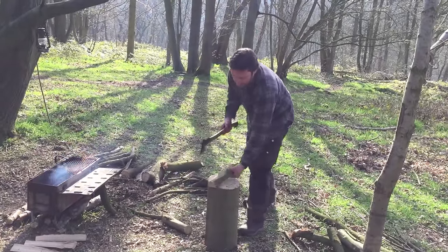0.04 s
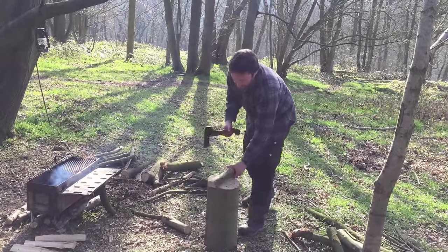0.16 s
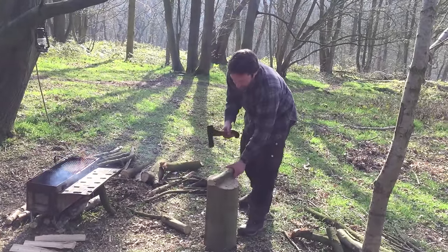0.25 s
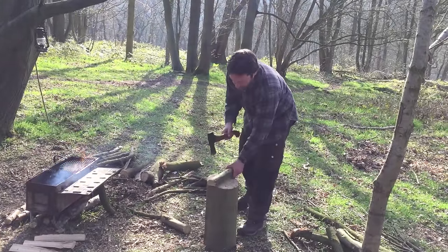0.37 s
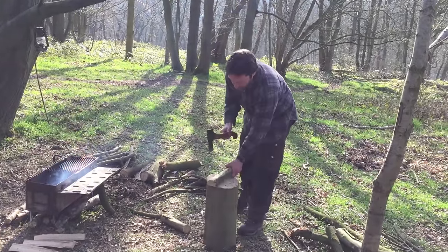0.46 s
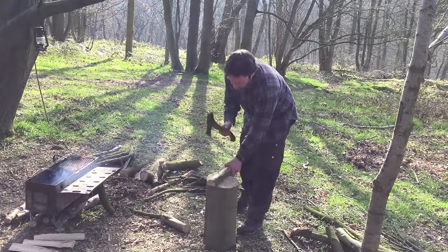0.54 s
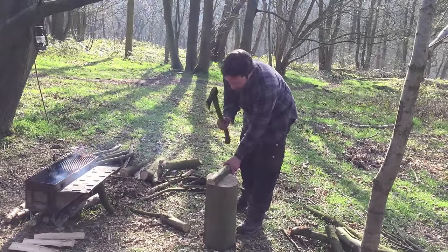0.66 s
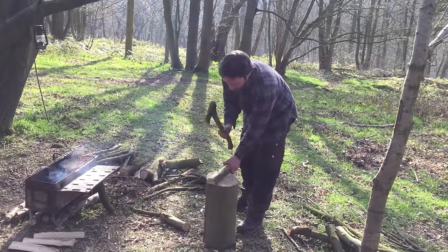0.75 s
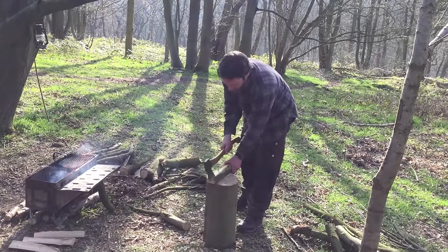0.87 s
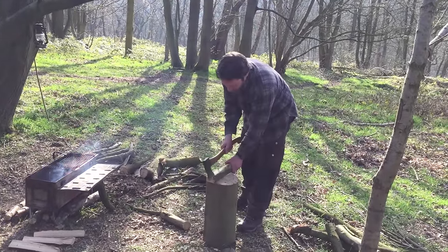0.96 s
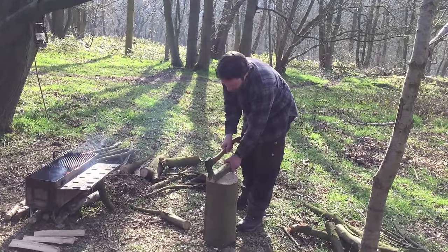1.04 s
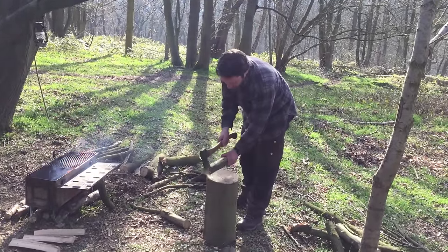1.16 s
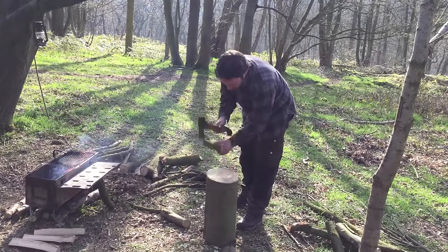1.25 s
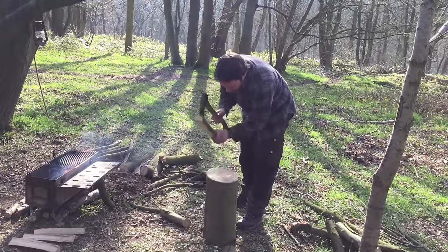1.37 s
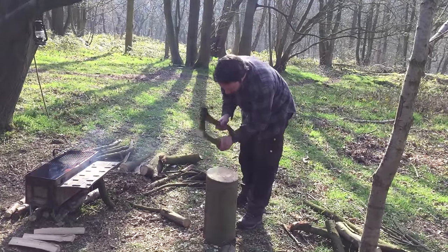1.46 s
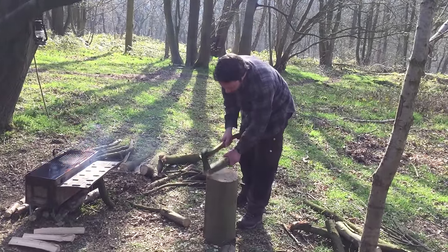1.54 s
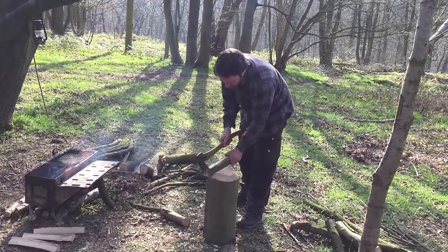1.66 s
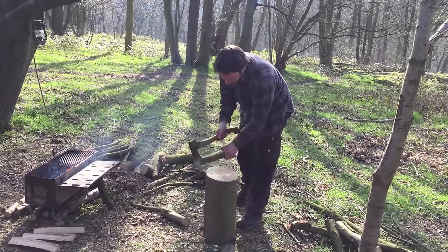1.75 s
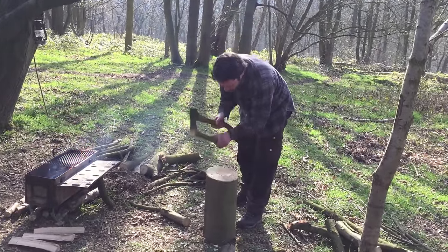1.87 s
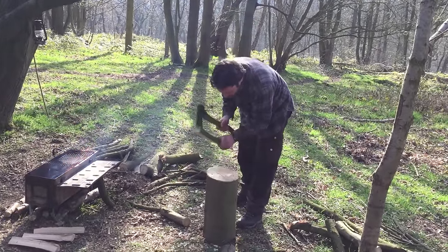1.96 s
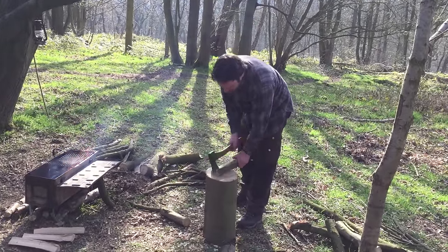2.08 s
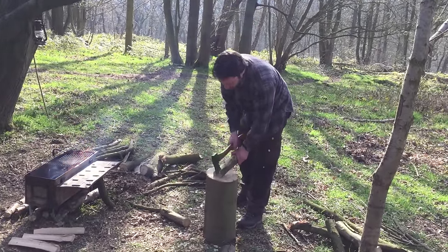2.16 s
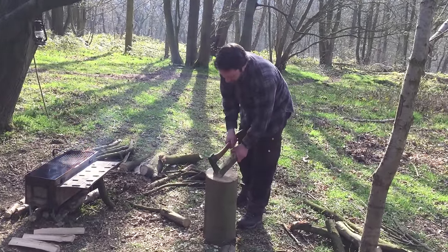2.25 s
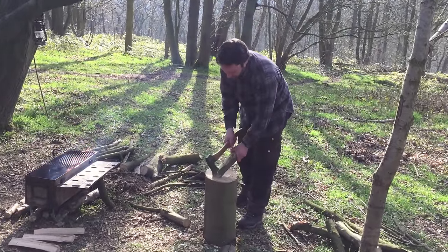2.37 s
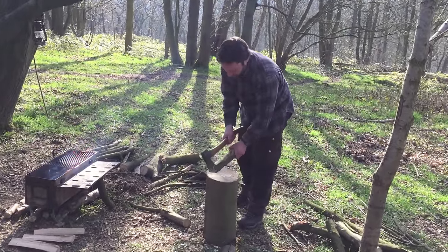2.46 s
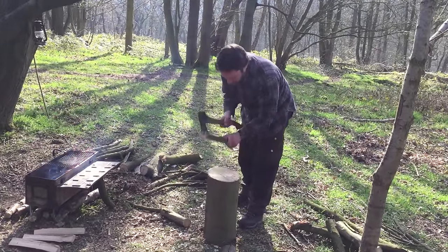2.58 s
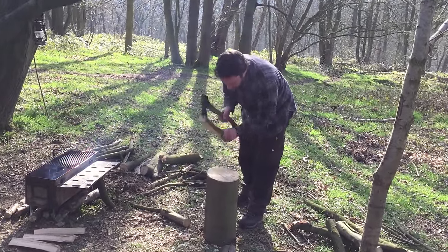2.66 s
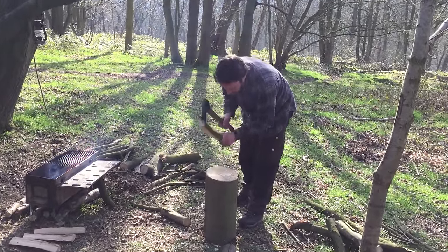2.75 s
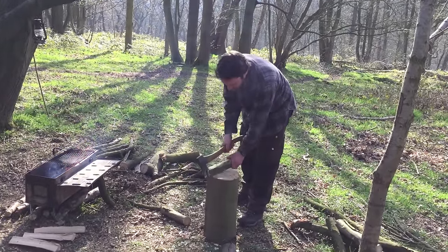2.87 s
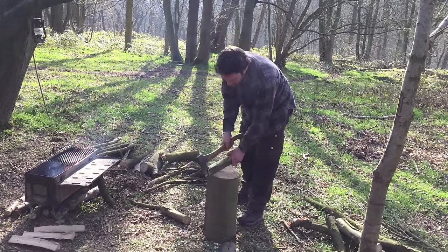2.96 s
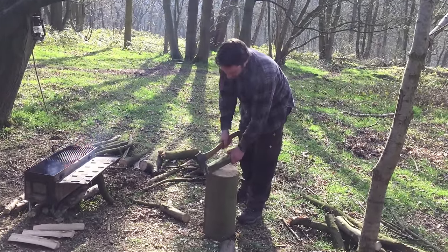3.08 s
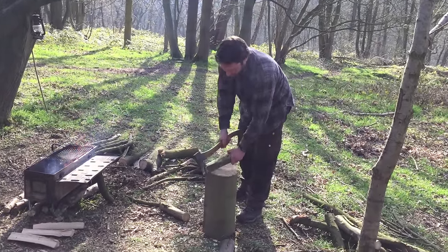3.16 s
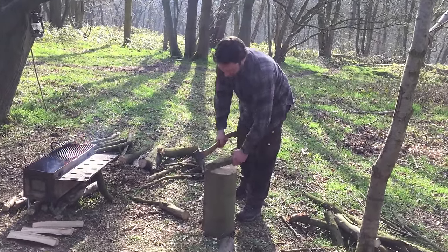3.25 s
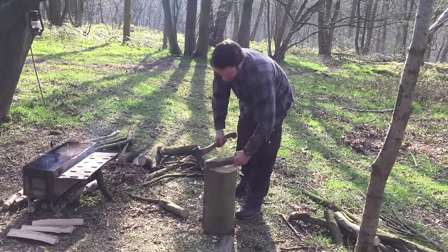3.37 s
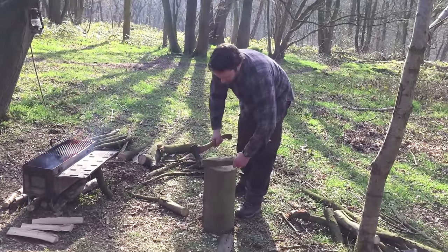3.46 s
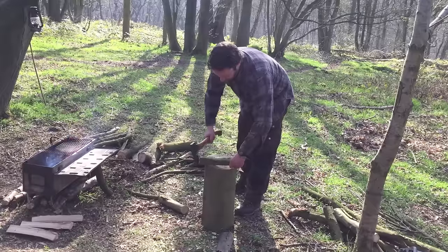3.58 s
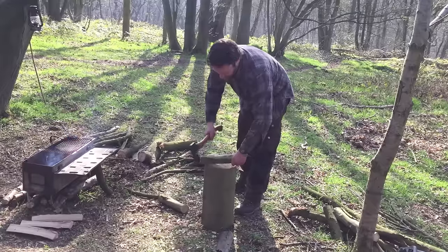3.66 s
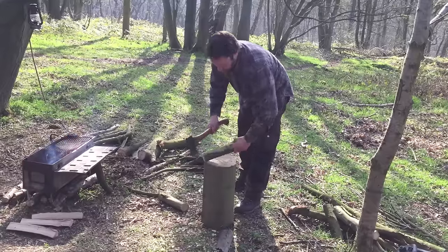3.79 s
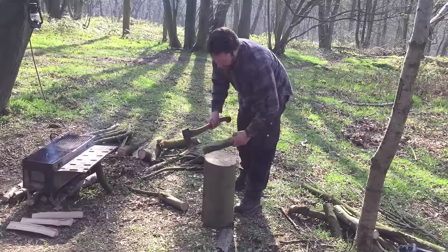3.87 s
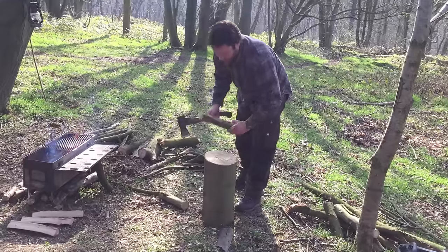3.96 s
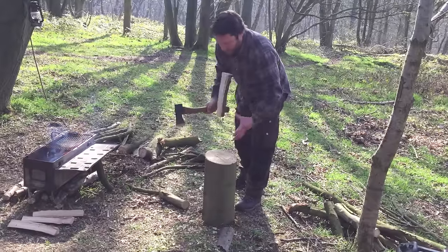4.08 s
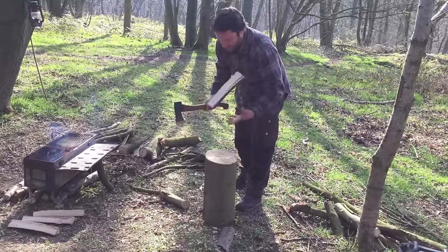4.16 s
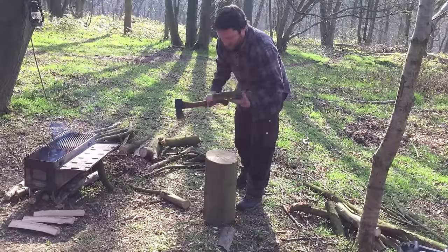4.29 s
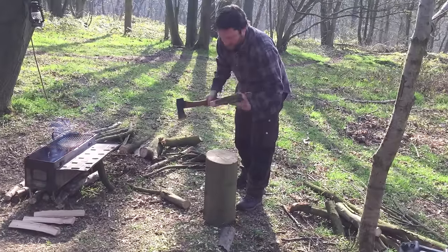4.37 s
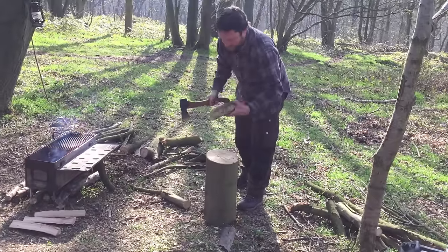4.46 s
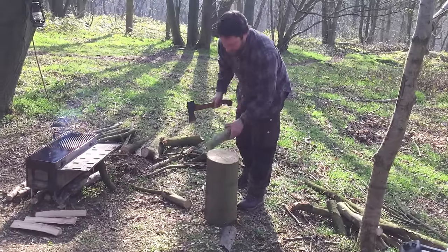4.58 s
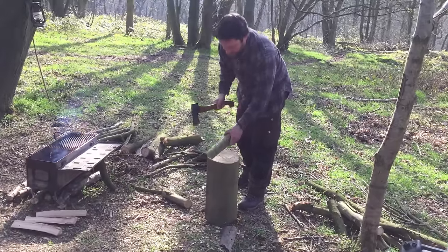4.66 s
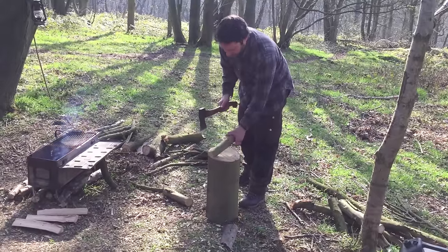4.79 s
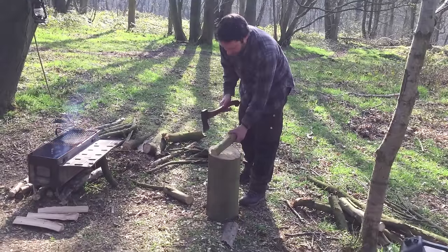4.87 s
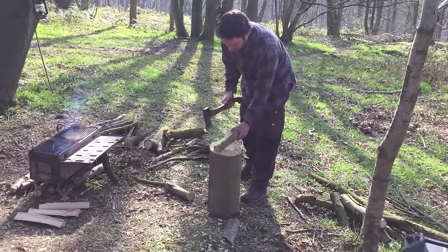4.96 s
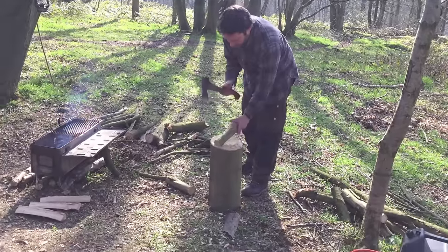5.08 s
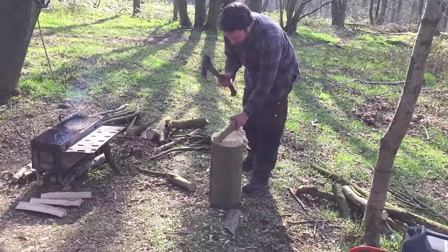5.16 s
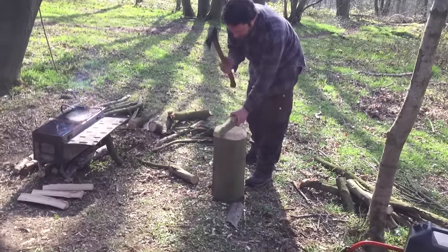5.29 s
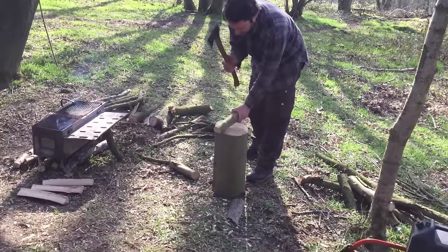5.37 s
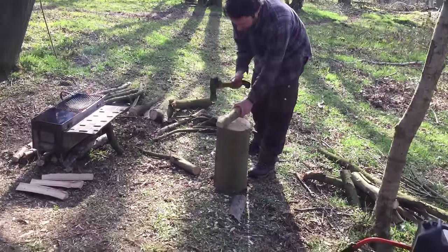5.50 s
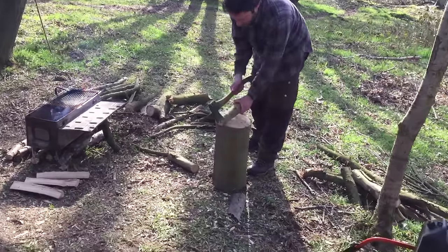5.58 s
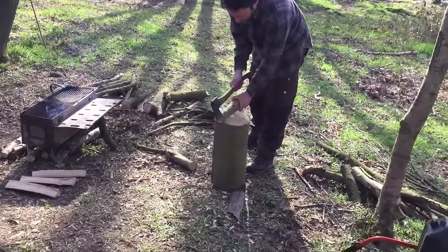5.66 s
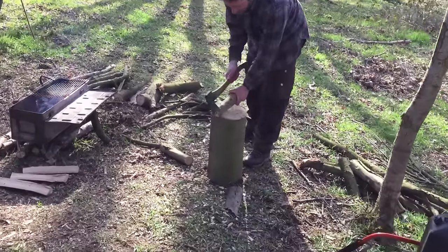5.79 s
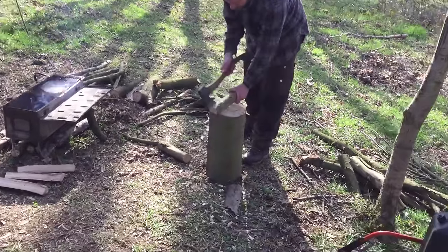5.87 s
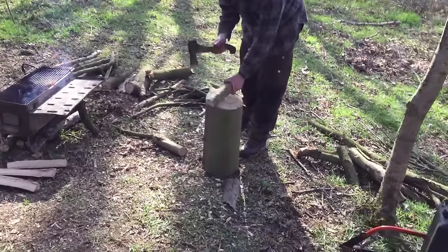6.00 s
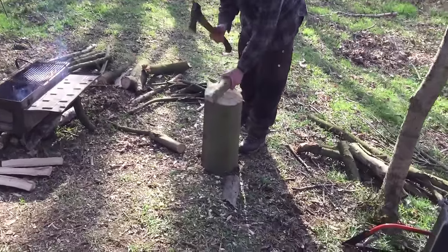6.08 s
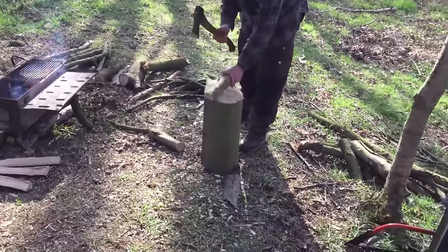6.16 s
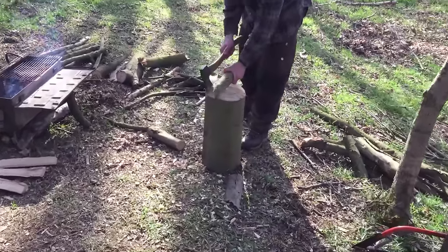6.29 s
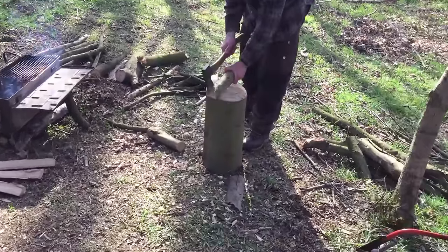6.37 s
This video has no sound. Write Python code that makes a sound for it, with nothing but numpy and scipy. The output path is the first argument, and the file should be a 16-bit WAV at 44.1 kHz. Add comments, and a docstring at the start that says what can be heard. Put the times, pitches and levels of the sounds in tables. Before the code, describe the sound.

A hatchet strikes a stick on an upright log four times at uneven intervals, each a sharp wooden chop with a crack. The stick is then levered apart, tearing in a quick run of splintery snaps. After a pause with a few faint knocks, two more chops follow. The blows sound fairly near and echo briefly among the trees, over small birds and a faint traffic rumble.

```python
"""A spring wood: a hatchet chops a stick on an upright log; once the stick is levered apart and tears.
Each blow is a run of jolts that rings log and stick. Fibres part with a crack and a splinter ring;
the knocked stick rings in its bending modes. Small birds sing near-sine notes, far traffic rumbles,
leaves and clothes rustle. The trunks scatter wood sounds and song back."""
import sys
import numpy as np
from scipy import signal
from scipy.fft import rfft, irfft
from scipy.io import wavfile
from scipy.ndimage import uniform_filter1d

SR = 44100
rng = np.random.default_rng(int(sys.argv[2]) if len(sys.argv) > 2 else 0)


def to_wav(sig):
    """Store sig (one row per channel, or 1-D mono) as 16-bit WAV at the path in sys.argv[1].

    Samples outside -1..1 are clipped; the rate is SR.
    """
    pcm = np.clip(np.atleast_2d(sig), -1, 1) * 32767
    pcm = np.round(pcm).astype(np.int16)
    wavfile.write(sys.argv[1], SR, pcm.T)  # frames by channels


N = 283563

# hatchet blows: (time [s], level [dB], stick pitch [Hz], stick ring [dB], crack [dB], thud [dB], bite [s])
CHOPS = [ (0.9965, -3, 788, 1, -3, -17.5, 0.0041), (1.681, 5.5, 1224, 1.5, -12, -25.5, 0.0023),
         (2.185, 1.5, 2230, 10, -4.5, -23, 0.0026), (2.995, 4.5, 1505, -0.5, -8.5, -24.5, 0.0023),
         (5.678, -1.5, 1110, -11, -4, -27, .004), (6.398, -1.5, 1110, 3.5, -6, -16.5, 0.0057), ]
# log modes: (frequency [Hz], level [dB], t60 [s])
LOG_MODES = [(864, -11, 0.0046), (1130, 3.5, 0.014), (1310, -2.5, 0.0048), (1670, 0, 0.026),
             (2010, 2.5, .012), (2650, -5, .012), (3610, -14, 0.0076), (4370, -15, 0.014)]
# spectrum of breaking fibres: (frequency [Hz], level [dB])
CRACK_SPECTRUM = [(300, -47), (700, -28.5), (1300, -19), (2000, -10.5), (3400, -2), (4700, -16), (5800, -7),
                  (9000, -8.5), (10300, -11.5), (16000, -16.5)]
# single fibres snapping: (time [s], peak [dB], splinter pitch [Hz], crack re ring [dB])
SNAPS = [ (0.0943, -34, 5500, 9), (1.415, -29.5, 5190, 10.5), (1.644, -14.5, 2335, -3.5),
         (1.7822, -25.5, 3380, 3.5), (2.088, -6.5, 2389, 3.5), (2.563, -38, 3400, 3.5),
         (2.6745, -10, 2720, 3.5), (3.2556, -32, 4000, 6), (3.3003, -13, 3120, 8),
         (3.3189, -11.5, 3070, 1.5), (3.337, -15.5, 5390, -0.5), (3.3477, -8, 4180, 2.5),
         (3.3605, 1, 3223, 2.5), (3.3854, 3.5, 3060, 0), (3.4223, -7.5, 3844, 7), (3.429, -9, 4120, 5),
         (3.449, -11, 3946, -1.5), (3.4657, -26, 4200, -2), (3.4944, -21, 3950, 0.5),
         (3.555, -20, 3520, 11), (3.5774, -16, 3756, -5), (3.587, -14.5, 3664, -0.5),
         (3.598, -1.5, 3507, -4.5), (3.634, -5, 3480, -1), (3.693, -20, 2830, -14),
         (3.7447, -25.5, 3160, 22), (4.3824, -25.5, 4050, 3), (4.819, -25.5, 4000, 7),
         (5.6882, -3.5, 2460, 10), ]
# heaves on the blade: (start [s], length [s], level [dB])
HEAVES = [(3.299, 0.21, -34.5), (3.531, 0.19, -35.5)]
# stick knocked or flexed: (time [s], peak [dB], pitch [Hz])
KNOCKS = [ (0.108, -9.5, 1583), (1.645, -31.5, 310), (2.674, -29, 305), (2.98, -31, 300),
          (3.362, -25.5, 760), (3.387, -20.5, 756), (3.6, -25, 505), (3.636, -29, 1535),
          (3.697, -34.5, 1500), (3.814, -42, 765), (4.382, -34.5, 301), (4.818, -39, 802),
          (4.839, -33, 1500), (4.997, -44, 1530), ]
# bird syllables: ([(time [s], pitch [Hz], level [dB]), ...], first start [s], spacing [s], count)
RISE = [(0, 4320, -53), (.024, 4110, -45.5), (.046, 5550, -50.5), (.056, 5730, -39.5)], -.068, .1327, 4
TRILL = [(0, 6805, -62.5), (.006, 4287, -65)], 1.2, .0309, 12
DROP = [(0, 6170, -73), (.03, 6180, -72), (.045, 5400, -72), (.068, 4840, -78), (.085, 4600, -64.5),
        (.106, 4590, -74)], 4.292, 0.17, 5
SINGLE_ARCHED_CALL = [(0, 5500, -41), (.015, 6246, -48.5), (.07, 6320, -47), (.09, 5700, -48.5),
                      (.12, 4210, -52.5)], .98, 0, 1
# single bird whistles: (start [s], length [s], start pitch [Hz], end pitch [Hz], level [dB])
WHISTLES = [ (0.438, .21, 7230, 6820, -57.5), (0.487, 0.1, 3560, 3710, -73),
            (0.701, 0.15, 5150, 4820, -53.5), (0.839, 0.036, 5840, 3680, -51.5),
            (1.146, 0.22, 3625, 3723, -57), (4.257, 0.09, 7590, 6990, -76.5),
            (4.41, 0.062, 4280, 4080, -74), (4.623, 0.077, 7200, 6800, -75), (4.659, 0.04, 4200, 3950, -69),
            (4.749, 0.058, 4450, 4400, -73), (4.766, 0.064, 7300, 6700, -73),
            (4.928, 0.07, 7300, 6800, -77.5), (4.941, 0.076, 3380, 3560, -73.5),
            (5.21, 0.083, 7460, 6740, -78), (5.265, 0.085, 4390, 4277, -69),
            (5.389, 0.07, 7060, 6800, -73.5), (5.527, 0.072, 7500, 6880, -70.5),
            (5.549, 0.078, 8350, 7910, -73.5), (5.646, 0.041, 5600, 4000, -66),
            (5.794, 0.029, 5750, 5710, -62), (5.799, 0.17, 3670, 3900, -63),
            (5.997, 0.03, 2996, 3306, -65.5), (6.04, 0.021, 8250, 7380, -72.5),
            (6.097, 0.069, 3730, 4300, -64.5), (6.181, 0.043, 3620, 3497, -67),
            (6.228, 0.078, 6400, 7770, -67), (6.259, 0.22, 6600, 6150, -72.5), ]
# spectrum of forest air and far traffic: (frequency [Hz], level [dB])
AIR_SPECTRUM = [(15, -52), (25, -35), (51, -5.5), (74, 2), (167, -10.5), (202, -12.5), (457, -25),
                (538, -23.5), (2330, -32), (3800, -34), (7100, -40.5), (10400, -45.5), (15200, -44),
                (16500, -57)]
# traffic swell: (time [s], level [dB])
TRAFFIC_SWELL = [(0, 3.5), (2.6, 4), (4.25, 1.5), (5, 3), (6.43, 4)]
# distant engine: (time [s], pitch [Hz], level [dB])
ENGINE_HUM = [(0, 152.1, -50.5), (1.2, 156.1, -53), (2.498, 153, -53.5), (2.902, 146.7, -74.5)]
# clothes and leaves brushing: (centre [s], length [s], level [dB])
RUSTLES = [(.2, .4, -68), (.43, 0.057, -58), (3.8, 0.47, -72.5), (5.35, 0.51, -68), (5.9, 0.31, -63)]
# echo tail decay: (frequency [Hz], t60 [s])
ECHO_DECAY = [(300, 0.1), (800, .8), (2000, 0.76), (5500, .6), (12000, 0.34)]
# echo spectrum: (frequency [Hz], level [dB])
ECHO_SPECTRUM = [(200, -9.5), (700, -7), (1400, 0), (2500, -1.5), (5000, 0.5), (12000, -4)]

FIBRES_PER_S, FIBRE_LOW_HZ, FIBRE_HIGH_HZ, FIBRE_SIZES = 190, 2100, 5200, 6
CHOP_ECHO_DB, SNAP_ECHO_DB, KNOCK_ECHO_DB, SONG_ECHO_DB = -16.5, -19, -26, -7.5
AIR_DB, LEAVES_DB = -51.5, -79
HIT_SAMPLES = 4096


def chop(level_db, stick_hz, ring_db, crack_db, thud_db, bite_s):
    """The blade bites in with a swelling run of jolts that ring log and stick; the trunks echo it."""
    t = np.arange(700) / SR
    envelope_db = np.where(t < bite_s, -26 * (0.5 - t / bite_s), -60 * (t - bite_s) / 0.019)
    jolts = rng.standard_normal(len(t)) * amp(envelope_db + 3.9 * rng.exponential(1, len(t)))
    wood = signal.fftconvolve(jolts, rings(LOG_MODES + [(stick_hz, ring_db, 0.014)]))
    highpass = signal.butter(2, 550, "high", fs=SR)  # bass trimmed from the ring; thud added separately
    wood = unit_peak(signal.lfilter(*highpass, wood))
    add(wood, bite_s * 0.61, amp(crack_db) * crack(t60_s=0.018))
    diffuse = rings([(stick_hz, 0, 0.0035), (1700, -2, 0.002)])  # modes blur over all directions
    diffuse *= np.linalg.norm(wood) / np.linalg.norm(diffuse)
    out = amp(CHOP_ECHO_DB) * trunk_echo(diffuse + amp(-7.5) * wood[:HIT_SAMPLES])
    add(out, 0, wood)
    log_thud = np.convolve(np.hanning(40) / 20, rings([(289.2, 0.97, 0.045)]))
    add(out, bite_s, amp(thud_db) * log_thud)
    ground_thump = unit_peak(np.convolve(np.hanning(500), rings([(51.9, 0, 0.15)])))
    add(out, 0.015, amp(-39.5) * ground_thump)  # slower path through the ground
    return amp(level_db) * out


def crack(t60_s):
    """Fibres break: a short swell into one click, fast-dying noise, a crackling tail."""
    t = np.arange(HIT_SAMPLES) / SR
    grit = rng.standard_normal(len(t)) * amp(1.8 * rng.exponential(1, len(t)))
    grit[30] = 9  # the click
    attack = np.minimum(t / 0.001, 1) ** 2
    tail = amp(4 * flutter(len(t), 40) - 23 - 60 * t / 0.1)
    return unit_peak(coloured(grit, CRACK_SPECTRUM) * attack * (amp(-60 * t / t60_s) + tail))


def snap(peak_db, splinter_hz, crack_db):
    """One fibre parts: a crack and a short ring of the splinter."""
    kick = rng.standard_normal(50) * np.hanning(50)
    modes = rings([(splinter_hz, 0, 0.005), (splinter_hz * 0.62, -3, 0.005)])
    splinter = np.convolve(kick, modes)[:HIT_SAMPLES]
    splinter = unit_peak(np.diff(splinter, prepend=0))
    return amp(peak_db) * unit_peak(splinter + amp(crack_db) * crack(t60_s=0.013))


def tearing():
    """Small fibres of several sizes part at random while the blade levers."""
    strain = swells([(start_s + length_s / 2, length_s * 1.43, db) for start_s, length_s, db in HEAVES])
    out = np.zeros(N)
    for hz in np.geomspace(FIBRE_LOW_HZ, FIBRE_HIGH_HZ, FIBRE_SIZES):
        breaks = rng.random(N) < FIBRES_PER_S / FIBRE_SIZES / SR
        strength = amp(3.7 * np.minimum(rng.exponential(1, N), 3))
        out += signal.oaconvolve(breaks * strength * strain, snap(0, hz, crack_db=1.5))[:N]
    return out


def knock(peak_db, hz):
    """A free stick rings in its first bending modes after a soft contact."""
    t60_s = 0.065 * (hz / 1000) ** 0.45
    modes = [(hz, 0, t60_s), (hz * 1.09, -8, t60_s / 2), (hz * 0.59, -4, 0.012), (hz * 2.2, -11, 0.025)]
    return amp(peak_db) * unit_peak(np.convolve(np.hanning(14), rings(modes)))


def bird_note(times_s, pitches_hz, levels_db):
    """A gliding near-sine note, trembling slightly in pitch and level."""
    t = np.arange(times_s[0], times_s[-1], 1 / SR)
    tremble = flutter(len(t), 150)
    hz = np.interp(t, times_s, pitches_hz) * (1 + 0.0069 * tremble)
    envelope = amp(np.interp(t, times_s, levels_db) + 2.6 * tremble) * signal.windows.tukey(len(t), 0.2)
    return np.sqrt(2) * envelope * sine(hz)


def birds(lead_s=0.2, fade_db=-6.5):
    """Syllables and single whistles with their echo; the song starts before time zero."""
    song = np.zeros(N + round(lead_s * SR))
    for contour, first_s, spacing_s, count in (RISE, TRILL, DROP, SINGLE_ARCHED_CALL):
        for k in range(count):
            add(song, lead_s + first_s + k * spacing_s, bird_note(*np.transpose(contour)))
    for start_s, length_s, start_hz, end_hz, db in WHISTLES:
        mid_hz = start_hz + 0.65 * (end_hz - start_hz)  # quick glide, then settling
        note = bird_note([0, length_s / 2, length_s], [start_hz, mid_hz, end_hz], [db, db, db + fade_db])
        add(song, lead_s + start_s, note)
    echo = trunk_echo(amp(SONG_ECHO_DB) * song, near_db=3.5)[:len(song)]
    return (song + echo)[-N:]


def trunk_echo(x, near_db=10):
    """Sparse reflections off ground and trunks: a quick near cluster, a long thin tail."""
    taps = np.zeros(SR)
    slots = np.arange(400, SR - 20, 20)
    gains = rng.choice([-1., 1.], len(slots)) * amp(0.83 * rng.exponential(1, len(slots)))
    taps[slots + rng.integers(0, 20, len(slots))] = gains
    hz, t, spectra = signal.stft(taps, SR, nperseg=256)
    decay = amp(-60 * t / at_hz(ECHO_DECAY, hz)[:, None]) + amp(near_db - 60 * t / 0.1)
    colour = amp(at_hz(ECHO_SPECTRUM, hz))[:, None]
    response = signal.istft(spectra * decay * colour, SR, nperseg=256)[1]
    return signal.fftconvolve(x, response / np.linalg.norm(response))


def air_and_traffic():
    """Forest air: faintly patchy noise whose low end swells with far traffic."""
    frame_s = np.arange(N // 256 + 5) * 256 / SR
    hz = np.fft.rfftfreq(1024, 1 / SR)
    real, imag, patches = rng.standard_normal((len(frame_s), len(hz), 3)).T
    patches_db = 0.91 * unit_rms(uniform_filter1d(uniform_filter1d(patches, 10, axis=0), 14, axis=1))
    swell_db = np.interp(frame_s, *np.transpose(TRAFFIC_SWELL)) / (1 + (hz[:, None] / 1500) ** 2)
    air = signal.istft((real + 1j * imag) * amp(patches_db + swell_db), nperseg=1024, noverlap=768)[1]
    return amp(AIR_DB) * unit_rms(coloured(air[:N], AIR_SPECTRUM))


def engine_hum():
    """A distant engine: one low note, wavering in level."""
    t = np.arange(N) / SR
    times_s, hz, db = np.transpose(ENGINE_HUM)
    waver = unit_rms(uniform_filter1d(flutter(N, 1200), 1200))
    return amp(np.interp(t, times_s, db)) * (0.13 + waver) * sine(np.interp(t, times_s, hz))


def rustle():
    """Grainy hiss: a steady stir of leaves, swelling as clothes and leaves brush."""
    grains = rng.standard_normal(N) * amp(2.4 * flutter(N, 200))
    hiss = unit_rms(coloured(grains, [(1000, -27), (3000, -2.5), (8000, -2), (16000, -6)]))
    return hiss * (amp(LEAVES_DB) + swells(RUSTLES))


def amp(db):
    """dB to gain."""
    return 10 ** (np.asarray(db) / 20)


def unit_rms(x):
    """Scales to rms 1."""
    return x / np.sqrt(np.mean(x ** 2) + 1e-20)


def unit_peak(x):
    """Scales to peak 1."""
    return x / (abs(x).max() + 1e-20)


def flutter(samples, smooth_samples):
    """Smoothed noise, rms 1."""
    return unit_rms(uniform_filter1d(rng.standard_normal(samples), smooth_samples))


def sine(hz):
    """Sine following a pitch curve."""
    return np.sin(2 * np.pi * np.cumsum(hz) / SR)


def at_hz(points, hz):
    """Interpolates (frequency [Hz], value) on a log-frequency axis."""
    points_hz, values = np.transpose(points)
    return np.interp(np.log(hz + 1), np.log(points_hz + 1), values)


def coloured(x, spectrum):
    """Filters by (frequency [Hz], level [dB])."""
    hz = np.fft.rfftfreq(len(x), 1 / SR)
    return irfft(rfft(x) * amp(at_hz(spectrum, hz)), len(x))


def rings(modes):
    """Impulse response of modes (frequency [Hz], level [dB], t60 [s])."""
    t = np.arange(HIT_SAMPLES) / SR
    return sum(amp(db - 60 * t / t60_s) * np.sin(2 * np.pi * hz * t) for hz, db, t60_s in modes)


def swells(rows):
    """Gain curve of smooth swells (centre [s], length [s], level [dB])."""
    t = np.arange(N) / SR
    return sum(amp(db) * np.cos(np.pi * np.clip((t - centre_s) / length_s, -0.5, 0.5)) ** 2
               for centre_s, length_s, db in rows)


def add(mix, time_s, sound):
    """Mixes a sound in at time_s."""
    part = mix[max(round(time_s * SR), 0):][:len(sound)]
    part += sound[:len(part)]


def scene():
    """Wood sounds with their echoes, birds and background; mono."""
    blows, snaps, knocks = np.zeros((3, N))
    for time_s, *row in CHOPS:
        add(blows, time_s, chop(*row))
    for time_s, *row in SNAPS:
        add(snaps, time_s - 0.0003, snap(*row))  # the swell starts just before the peak
    snaps += tearing()
    for time_s, *row in KNOCKS:
        add(knocks, time_s, knock(*row))
    echoes = trunk_echo(amp(SNAP_ECHO_DB) * snaps + amp(KNOCK_ECHO_DB) * knocks)[:N]
    return (blows + snaps + knocks + echoes + birds() + air_and_traffic() + engine_hum() + rustle())[None]


def record(dry):
    """The loudest blows clip; then a low-pass at 16.2 kHz."""
    lowpass = signal.firwin(255, 16200, window=("kaiser", 7), fs=SR)
    return signal.oaconvolve(np.clip(dry, -1, 1), lowpass[None], "same")


dry = scene()
out = record(dry)
to_wav(out)
```